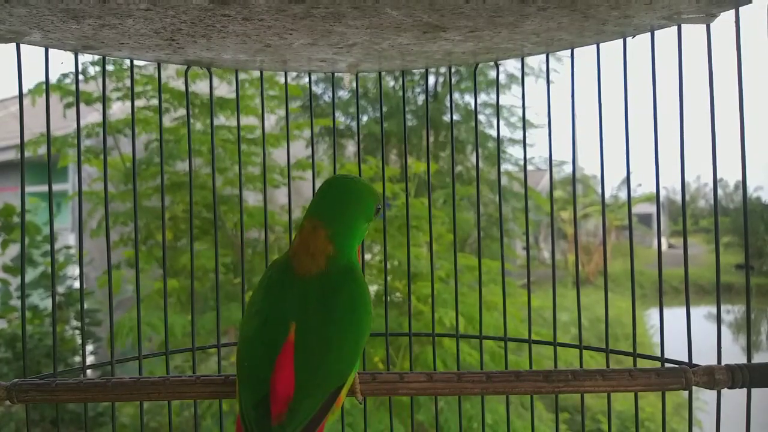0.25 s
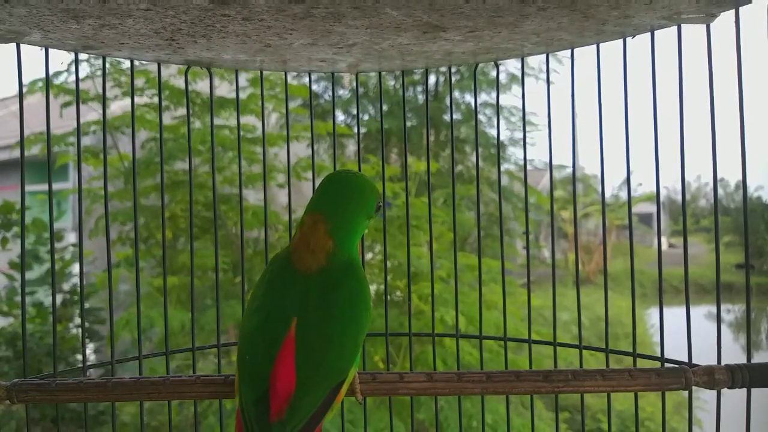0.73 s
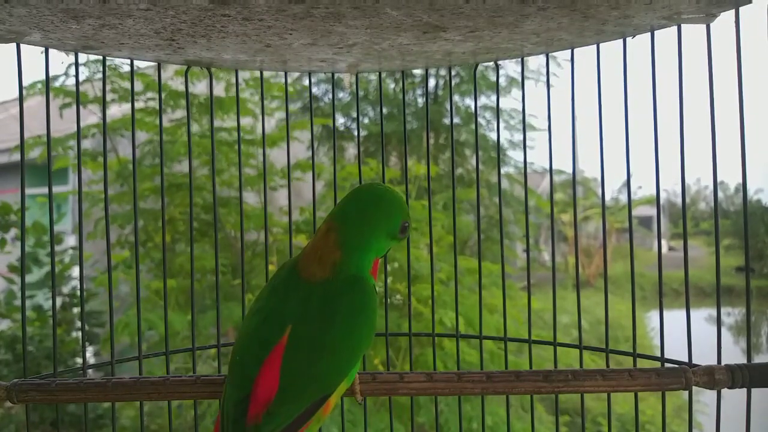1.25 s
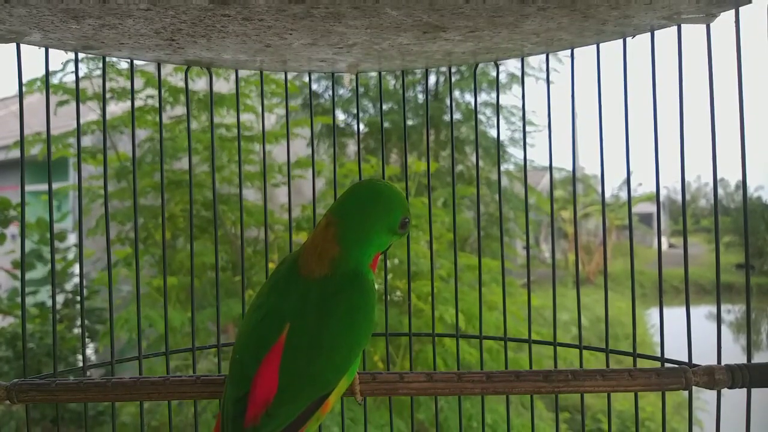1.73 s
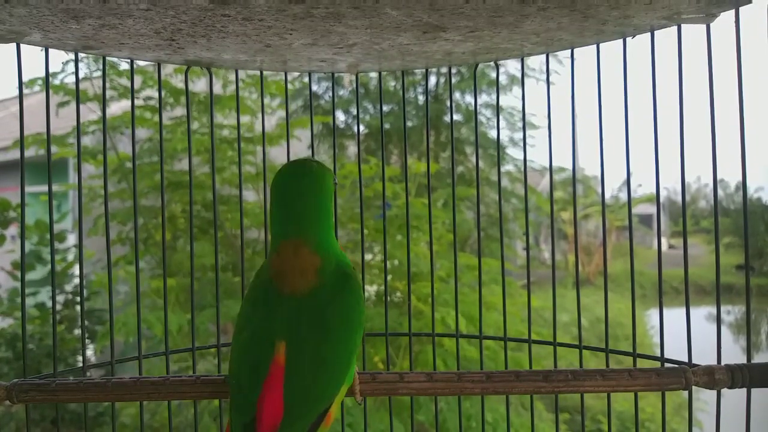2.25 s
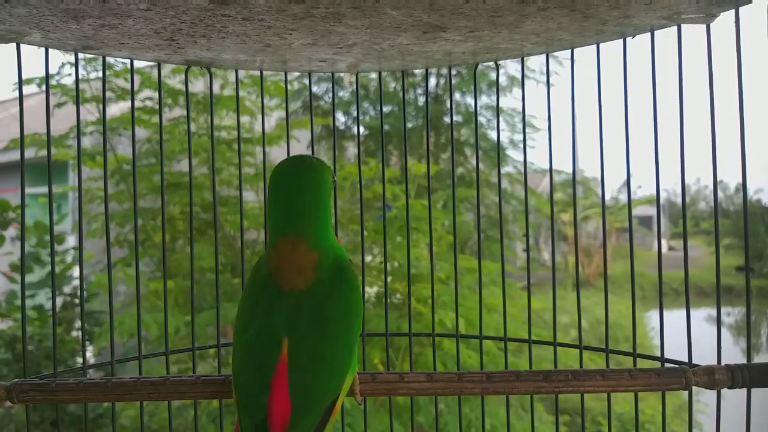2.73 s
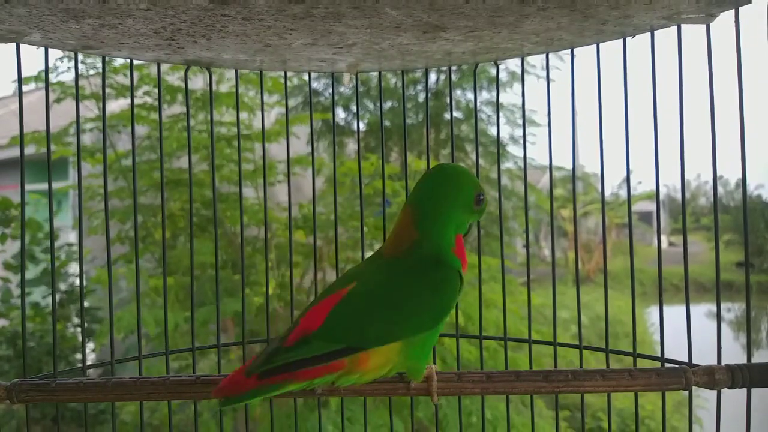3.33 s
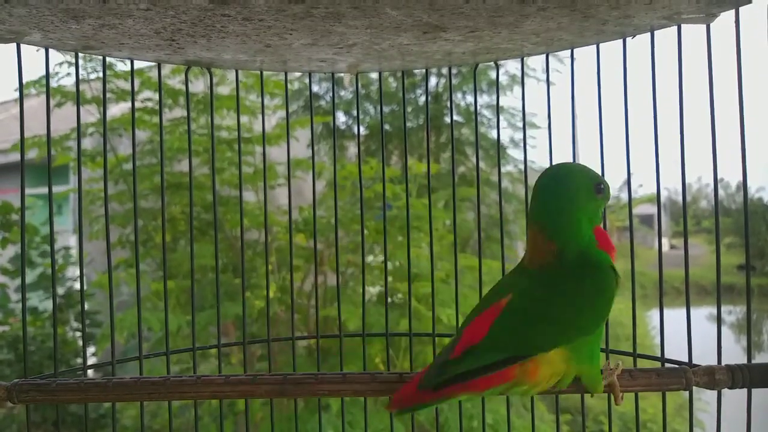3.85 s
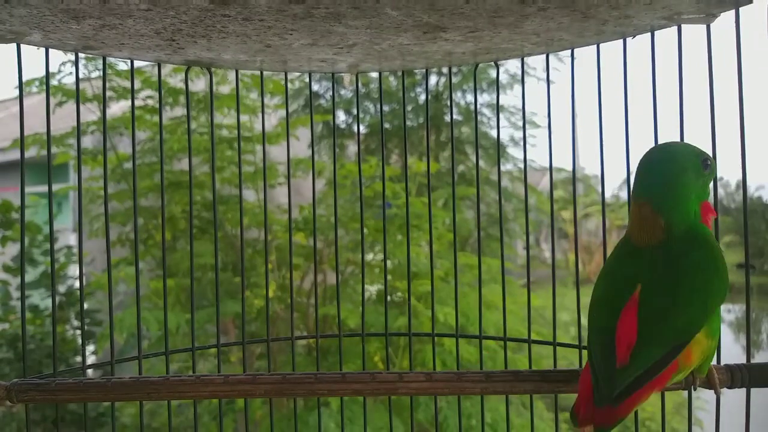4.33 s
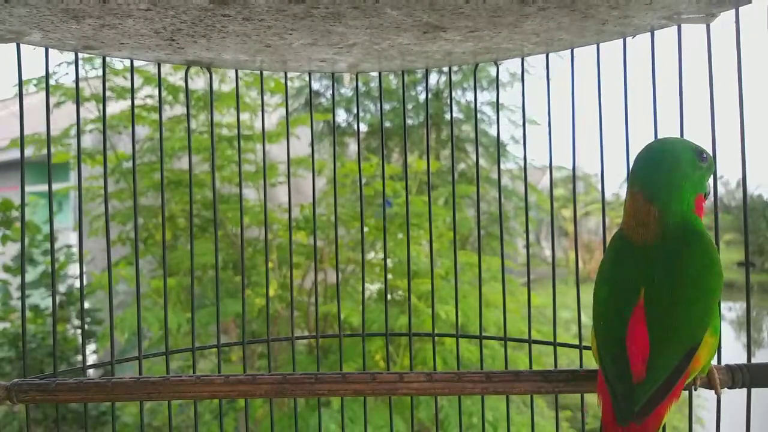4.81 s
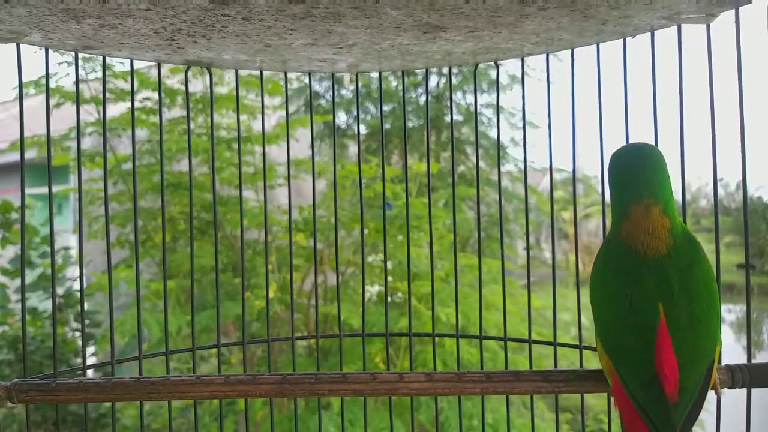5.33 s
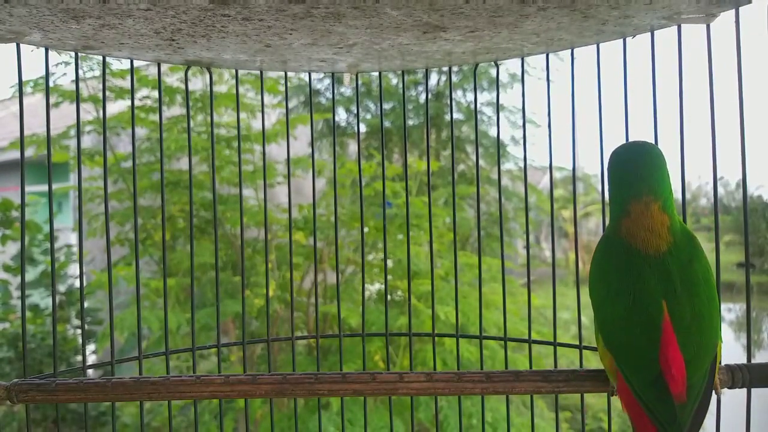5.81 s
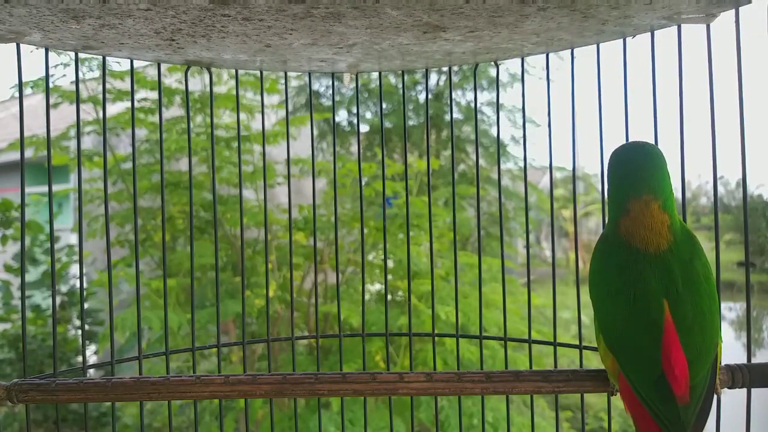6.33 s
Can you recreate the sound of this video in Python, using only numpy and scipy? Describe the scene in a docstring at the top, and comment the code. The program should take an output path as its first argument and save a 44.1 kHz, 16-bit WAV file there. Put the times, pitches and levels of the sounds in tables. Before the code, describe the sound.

A small caged parrot close by gives piercing whistles, fast trills and hoarse raspy bursts, then a hiss, with a rough squawk nearby and faint distant birds.

```python
"""Shrill whistles and trills of a small caged parrot close by: one gliding pitch with throat-shaped overtones.
Between them run hoarse bursts, chaotic harmonics mixed with noise, and swinging warbles; later comes a hiss,
noise through beak resonances. A rough low squawk, perhaps a larger bird nearby, rings in the yard: its lines
split by period doubling. Far birds tick, whistle, crow and chatter as faint tones and pulsing noise,
over a low hum of filtered noise."""
import sys
import numpy as np
from scipy import signal
from scipy.fft import rfft, irfft, next_fast_len
from scipy.io import wavfile
from scipy.ndimage import uniform_filter1d, map_coordinates

SR = 44100
rng = np.random.default_rng(int(sys.argv[2]) if len(sys.argv) > 2 else 0)


def to_wav(s):
    """Save 16-bit WAV."""
    ch = np.atleast_2d(s).T  # columns
    pcm = np.round(np.clip(ch, -1, 1) * 32767)  # PCM
    wavfile.write(sys.argv[1], SR, pcm.astype(np.int16))


N = 289737
T = np.arange(N) / SR  # time [s]
TOP_HZ = 15720  # band limit
# spectrum of the parrot's turbulent air: (frequency [Hz], relative level [dB])
RASP = [(1500, -48), (2100, -10), (4350, -13), (6000, -2), (7800, 1.5), (11600, -20), (13300, -53)]


def amp(db):
    """Decibel definition: 20 dB is a tenfold amplitude."""
    return 10 ** (np.asarray(db) / 20)


def unit(x):
    """Normalisation to unit root mean square."""
    return x / np.sqrt(np.mean(x ** 2) + 1e-20)


def along(points, hz):
    """Linear interpolation of (frequency [Hz], value) points on a logarithmic frequency axis."""
    f, v = np.transpose(points)
    return np.interp(np.log(hz + 1), np.log(f + 1), v)


def wobble(rate):
    """Slow random modulation: Gaussian knots, rate of them a second, joined by a spline."""
    knots = rng.standard_normal(int(N * rate / SR) + 4)
    return map_coordinates(knots, [T * rate])


def filtered(x, response):
    """Linear filtering: the spectrum of x times a complex response of frequency."""
    m = next_fast_len(N + 8192)
    return irfft(rfft(x, m) * response(np.fft.rfftfreq(m, 1 / SR)), m)[..., :N]


def coloured(x, spectrum):
    """Spectral shaping by (frequency [Hz], gain [dB]) points, then normalisation."""
    return unit(filtered(x, lambda hz: amp(along(spectrum, hz))))


def played(tables, fade):
    """Piecewise-linear control curves through all tables, and a gate that opens and shuts in fade seconds."""
    s, *cols = np.vstack(tables).T
    gate = 0
    for t in tables:
        inside = np.minimum(T - t[0][0], t[-1][0] - T)
        gate = gate + np.clip(inside / fade + .5, 0, 1)
    return [np.interp(T, s, c) for c in cols] + [np.clip(gate, 0, 1)]


def stack(hz, count):
    """Harmonic series 1..count, one row each: phase is the integral of a moving pitch."""
    phase = np.cumsum(2 * np.pi * hz / SR)
    return np.sin(np.arange(1, count + 1)[:, None] * phase)


def notes():
    """Vocal effort lifts pitch and level together: rows of (time, pitch, level, overtones) for each clear note."""
    # rising chirps: (start [s], length [s], start pitch [Hz], end pitch [Hz], peak level [dB], overtones [dB])
    rises = [(0.345, 0.034, 5560, 6045, -11.5, -3), (0.472, 0.013, 3660, 4216, -27, -14.5),
             (1.16, .026, 5457, 5720, -17, -11.5), (1.284, .015, 3400, 3857, -38, -11),
             (2.443, 0.06, 5650, 6004, -17.5, 9.5), (2.626, 0.012, 3434, 3510, -31, -13.5),
             (2.664, .036, 5035, 6050, -22.5, 14), (3.345, 0.035, 5437, 5857, -14, -3),
             (3.51, 0.017, 3259, 3420, -28, -8), (3.559, 0.029, 5490, 5800, -15, -1),
             (5.304, 0.035, 5575, 6220, -4.5, -1.5), (5.369, 0.033, 4780, 6080, -11.5, -9)]
    rise_db_per_oct, rise_peak, rise_fall_db = 126.5, .8, 2  # loudest at this share of the length, then eases
    # wide, fast sweeps: same columns
    sweeps = [(0.041, .013, 2719, 7030, -9, -8), (2.257, 0.0059, 3728, 1761, -20.5, 8),
              (2.264, .004, 4430, 2956, -21, 6.5), (2.372, 0.014, 6450, 7553, -1, -6.5),
              (2.6, .014, 4377, 3872, -27, -5), (5.277, .024, 4226, 5860, -22.5, -22.5),
              (5.409, 0.039, 6340, 4146, -18, -18.5), (5.661, 0.0079, 2160, 2883, -29, -11),
              (5.685, 0.011, 5720, 4233, -20, -27.5), (5.704, 0.014, 5300, 2944, -15.5, -26.5)]
    sweep_db_per_oct = 28.5
    # closing flourish: (time from its start [s], pitch [Hz])
    zigzag = [(0, 4076), (.011, 3120), (0.021, 4265), (.037, 3160), (.052, 2338)]
    # each flourish: (start [s], peak level [dB])
    zigzag_starts = [(.536, -27), (1.342, -31.5)]
    zigzag_overtones_db = -9
    # held shrill whistles: (start [s], length [s], start pitch [Hz], end pitch [Hz], peak level [dB],
    # overtones [dB], final droop [s])
    shrills = [(0.049, .23, 7010, 6776, -2, -6.5, .012), (2.275, .054, 6750, 6840, -5, -9, .03),
               (5.1, 0.095, 7420, 7280, -8, -13, 0.053), (5.199, 0.055, 6980, 7044, -7, -20, .022)]
    onset_s, onset_db, droop_db, droop_flat = .012, 4.5, 16.5, .068  # ends of a held whistle; flat is a share
    # opening notes of three runs, one curve each: (time [s], pitch [Hz], peak level [dB])
    openings = [
        [(.957, 2200, -47), (.99, 3080, -29), (1.03, 4100, -25), (1.075, 3360, -30), (1.104, 2330, -28)],
        [(3.193, 3864, -45.5), (3.212, 2770, -38.5), (3.24, 2300, -22), (3.272, 2220, -22.5)],
        [(3.824, 7080, -22), (3.832, 6046, -17.5), (3.842, 7840, -10.5), (3.858, 8500, -36)],
    ]
    # overtones of each opening note: (level [dB])
    opening_overtones = [-20, 2, 2.5]

    def effort(s, hz, db, over_db, db_per_oct):
        """Level falls in proportion to the octaves below the note's highest pitch."""
        return [(a, b, db - db_per_oct * np.log2(max(hz) / b), over_db) for a, b in zip(s, hz)]

    out = []
    for s, d, a, b, db, over in rises:
        climb = effort((s, s + rise_peak * d), (a, a + rise_peak * (b - a)), db, over, rise_db_per_oct)
        out.append(climb + [(s + d, b, db - rise_fall_db, over)])
    for s, d, a, b, db, over in sweeps:
        out.append(effort((s, s + d), (a, b), db, over, sweep_db_per_oct))
    since, pitch = np.transpose(zigzag)
    for s, db in zigzag_starts:
        out.append(effort(since + s, pitch, db, zigzag_overtones_db, sweep_db_per_oct))
    for s, d, a, b, db, over, droop in shrills:
        out.append([(s, a, db - onset_db, over), (s + onset_s, a, db, over), (s + d - droop, b, db, over),
                    (s + d, b * (1 - droop_flat), db - droop_db, over)])
    for note, over in zip(openings, opening_overtones):
        out.append([(*row, over) for row in note])
    return sorted(out, key=lambda note: note[0][0])


def whistles():
    """Source and filter: the syrinx sings one pitch, the throat sets its overtones, air rasps in trill breaks."""
    # trills: (first dip [s], dips [count], rate [Hz], pitch dip [0-1], level dip [0-1], pitch lead [turns])
    trills = [(.113, 9, 65.34, .15, .9, 0.012), (.977, 13, 123.9, .27, 0.62, 0.18),
              (2.27, 2, 113.7, 0.15, 0.95, 0.028), (2.2875, 14, 377.3, 0.1, 0.5, 0.17),
              (5.103, 16, 323, 0.1, 0.3, 0)]
    limp, flutter = .12, .03  # slow trills: delay of every second dip [turns], pitch flutter of long beats [share]
    # throat response: (frequency [Hz], gain [dB])
    throat = [(3300, 0), (4600, -13), (7000, 4), (9200, 6), (11800, -14), (14500, -32)]
    hz, db, over, gate = played(notes(), fade=.003)
    db = uniform_filter1d(db, size=90)
    level = amp(db + .7 * wobble(400)) * gate
    leak = .4
    hz = uniform_filter1d(hz, size=130)  # the muscles round off each turn of the pitch
    for start, dips, rate, bend, depth, lead in trills:
        turns = rate * (T - start)
        sharp = 2 + 280 / rate  # slow trills break briefly
        slow = rate < 100
        turns = turns - slow * limp * np.sin(np.pi * turns / 2) ** 2
        on = (turns > -.5) & (turns < round(dips) - .5)
        hz = hz * (1 - on * bend * (np.abs(np.cos(np.pi * (turns + lead))) ** sharp - .2))
        long_beat = np.clip(np.sin(np.pi * turns), 0, 1)
        hz = hz * (1 + on * slow * flutter * long_beat * wobble(1500))
        dip = on * np.abs(np.cos(np.pi * turns)) ** sharp
        level = level * (1 - np.clip(depth, 0, 1) * dip)
        leak = leak + dip
        over = over - 12 * dip
    hz = hz * (1 + .0069 * wobble(500))
    k = np.arange(1, 6)[:, None]  # harmonic number
    shape_db = along(throat, k * hz) - along(throat, hz)  # relative to the fundamental
    overtone_db = (k > 1) * (over + 1.5 * wobble(300)) - .75 * (k - 1) ** 2
    gains = amp(shape_db + overtone_db) * (k * hz < TOP_HZ)
    air = amp(db - 33.5) * leak * gate * coloured(rng.standard_normal(N), RASP)
    return level * (gains * stack(hz, count=5)).sum(0) + air


def hoarse():
    """Chaotic vibration: a low, lurching pitch whose harmonics flare in turbulent air; clear notes hush it."""
    # hoarse runs, one curve each: (time [s], level [dB])
    runs = [
        [(.283, -34), (.38, -25.5), (.47, -28.5), (.58, -40)],
        [(.96, -39), (1.02, -25), (1.27, -27.5), (1.29, -38.5), (1.39, -32)],
        [(2.251, -25.5), (2.383, -30)],
        [(2.441, -31.5), (2.5, -22.5), (2.65, -27.5), (2.7, -20.5), (2.755, -28.5)],
        [(3.22, -40), (3.275, -22.5), (3.55, -25), (3.59, -21), (3.645, -29)],
        [(5.17, -25), (5.2, -29), (5.26, -36.5), (5.34, -22), (5.445, -20.5)],
    ]
    db, gate = played(runs, fade=.01)
    hz = 1950 * (1 + .12 * wobble(45) + .03 * wobble(700))
    flare = np.array([1 + .7 * wobble(180) for _ in range(3)])
    lines = unit((flare * stack(hz, count=5)[2:]).sum(0))  # harmonics 3 to 5
    chaos = lines + 1.35 * rng.standard_normal(N)
    hush = 1 - .65 * played(notes(), fade=.0029)[-1]
    return amp(db) * gate * hush * unit(amp(1.6 * wobble(260)) * coloured(chaos, RASP))


def warbles():
    """Frequency modulation: a rough tone swings down and up again, loudest at the top."""
    # tones within the hoarse bursts: (start [s], length [s], peak level [dB])
    swings = [(0.375, 0.095, -20), (1.185, 0.1, -24), (2.491, 0.082, -14), (2.699, 0.03, -17.5)]
    top_hz, swing_hz, period_s, lead_s, dip_db = 8070, 2160, .053, .016, 9.5
    start = np.array([s for s, _, _ in swings])
    db, gate = played([[(s, db), (s + d, db)] for s, d, db in swings], fade=.006)
    since = T - start[np.clip(np.searchsorted(start, T + .01) - 1, 0, None)]
    down = np.sin(np.pi * (since - lead_s) / period_s) ** 4
    hz = (top_hz - swing_hz * down) * (1 + .015 * wobble(600))
    return gate * amp(db - dip_db * down) * stack(hz, count=1)[0]


def hiss():
    """Turbulence through resonances of the half-open beak; the treble fades as the push weakens."""
    # course of the hiss: (time [s], level below the treble [dB], treble relative to that [dB])
    course = [(3.85, -50.5, 22.5), (3.93, -32.5, -2.5), (4.2, -30.5, -9), (4.5, -36, -36.5)]
    # beak resonances, before they slide: (centre [Hz], width [Hz], gain [dB])
    resonances = [(4760, 160, 3), (6470, 530, 2.5), (8460, 660, 3)]
    # the resonances sink as the beak closes: (time [s], frequency factor [ratio])
    slide = [(4.1, 1.01), (4.4, 0.96)]
    db, treble_db, gate = played([course], fade=.011)

    def beak(f):
        """Parallel band-pass resonators of alternating sign."""
        total = 0
        for k, (c, w, g) in enumerate(resonances):
            total = total + (-1) ** k * amp(g) * 1j * f * w / (c * c - f * f + 1j * f * w)
        return total

    (s0, wide), (s1, narrow) = slide

    def both_ends(f):
        """Open and closing beak, each with a direct leak, within a common band."""
        return ([beak(f / wide), beak(f / narrow)] + np.array(.1)) * (f > 1500) / (1 + (f / 12000) ** 12)

    shut = np.clip((T - s0) / (s1 - s0), 0, 1) * np.pi / 2
    breath = rng.standard_normal((2, N)) * amp(2.2 * wobble(230))
    ends = filtered(breath, both_ends)
    air = ends[0] * np.cos(shut) + ends[1] * np.sin(shut)  # equal-power crossfade
    low = filtered(air, lambda f: 1 / (1 + (f / 5500) ** 10))
    return gate * amp(db) * (unit(low) + amp(treble_db) * unit(air - low))


def squawk():
    """Period doubling: strong and weak cycles alternate under effort, putting wavering lines about halfway."""
    # squawks: (start [s], hold [s], pitch at start of hold [Hz], pitch at its end [Hz], level [dB])
    table = [(4.091, 0, 1440, 1420, -25), (4.122, 0.0044, 952, 934, -24), (4.455, 0.37, 1038, 1050, -23),
             (5.285, 0.047, 981, 987, -35), (5.386, 0.015, 848, 883, -37.5)]
    # gullet response: (frequency [Hz], relative gain [dB])
    gullet = [(600, -34), (1050, -3.5), (1440, -16.5), (2000, -5), (3600, -2.5), (4400, -14.5),
              (6200, -24.5), (12500, -29), (13500, -59)]
    attack_s, attack_db, release_s, release_db = .07, 7, .2, 24
    end_flat = .04  # pitch is this share flat at both ends of a call
    crowd, sink = .015, .08  # loud calls: overtones are this share flat; the whole-numbered ones sink this much more
    times = np.cumsum([(s, attack_s, hold, release_s) for s, hold, *_ in table], axis=1)
    # a new call cuts the last one short
    times = np.flip(np.minimum.accumulate(np.flip(times).ravel())).reshape(times.shape)
    flat = end_flat * np.array([1, 0, 0, 1])
    soft_db = np.array([attack_db, 0, 0, release_db])
    calls = []
    for t, (_, _, a, b, db) in zip(times, table):
        pitch = np.repeat([a, b], 2) * (1 - flat)
        calls.append(np.transpose([t, pitch, db - soft_db, [db] * len(t), np.linspace(0, 1, len(t))]))
    hz, db, top_db, late, gate = played(calls, fade=.02)
    effort = np.clip((db + 42) / 20, .55, 1)  # a harder push is rougher
    strain = np.clip((top_db + 32) / 9, 0, 1)  # loud calls split and crowd their lines
    voice = 1.85 * effort * rng.standard_normal(N)  # rasping air
    for k in range(2, 12):  # lines at multiples of half the pitch
        drift = 1 + .001 * k * wobble(6) * strain + .026 * effort * wobble(250)
        crowding = 1 - (k > 2) * strain * (crowd + sink * late * (k % 2 == 0))
        line_gain = amp(-(22 - 18 * strain) * (k % 2))  # halfway lines are weaker
        throb = .35 + .65 * wobble(55)
        voice += line_gain * throb * stack(k / 2 * crowding * hz * drift, count=1)[0]
    return gate * amp(uniform_filter1d(db, size=400)) * coloured(voice, gullet)


def far_birds():
    """Faint tones and noise under amplitude envelopes: double ticks, thin whistles, crowing, pulsing chatter."""
    # ticks: (time [s], level [dB])
    tick_table = [(1.4852, -39), (2.149, -41.5), (5.867, -45), (5.999, -41.5), (6.1367, -39.5),
                  (6.281, -39), (6.403, -38.5)]
    # thin whistles: (start [s], end [s], start pitch [Hz], end pitch [Hz], level [dB])
    thin = [(1.865, 2.024, 4565, 3940, -55.5), (6.166, 6.343, 4380, 3950, -62.5)]
    # crowing: (start [s], end [s], start pitch [Hz], level [dB])
    crows = [(1.633, 1.806, 364, -67.5), (2.011, 2.23, 338.7, -66.5)]
    # harmonics heard of each crow: number: gain [dB]
    crow_harmonics = {3: -2.5, 4: 0}
    crow_top_hz = 392  # each crow eases up to this pitch
    # chatter, one curve each: (time [s], level before the pulses [dB])
    chatter = [
        [(1.54, -64.5), (2.24, -59)],
        [(5.9, -64.5), (6.57, -71)],
    ]
    out, t = np.zeros(N + SR), np.arange(SR // 50) / SR
    tick = amp(-60 * t / .021) * (1 - np.exp(-t / .00042)) * np.sin(2 * np.pi * 7400 * t)
    for s, db in tick_table:
        out[round(s * SR):][:len(t)] += amp(db) * tick
        out[round((s + .024) * SR):][:len(t)] += amp(db - 10) * tick
    out, quaver = out[:N], wobble(120)
    for start, end, hz0, hz1, db in thin:
        u = np.clip((T - start) / (end - start), 0, 1)
        hz = hz0 + (hz1 - hz0) * u ** 3 + 30 * quaver
        out += amp(db + 1.6 * quaver) * np.sin(np.pi * u) * stack(hz, count=1)[0]
    for start, end, hz0, db in crows:
        u = np.clip((T - start) / (end - start), 0, 1)
        lines = stack(crow_top_hz - (crow_top_hz - hz0) * (1 - u) ** 2 + 4 * quaver, count=4)
        out += np.sin(np.pi * u) * sum(amp(db + g) * lines[k - 1] for k, g in crow_harmonics.items())
    db, gate = played(chatter, fade=.046)
    blur = coloured(rng.standard_normal(N), [(5000, -35), (6200, -2.5), (7600, 3.5), (8800, -28)])
    swell = np.cos(np.pi * 7.65 * (T - 1.575)) ** 2  # 7.65 pulses a second
    return out + gate * amp(db) * (.41 + swell) * blur


def hum():
    """Distant traffic and air: low-weighted noise, highly correlated between the two ports."""
    # hum spectrum: (frequency [Hz], relative level [dB])
    spectrum = [(25, -34.5), (90, -2), (200, -3), (420, -21), (700, -30), (1000, -42.5), (7300, -41),
                (8500, -51), (15000, -57.5)]
    # slow swell: (time [s], level [dB])
    swell = [(.9, -54), (2.2, -50), (5.1, -53), (5.7, -50.5)]
    mid, side = [coloured(rng.standard_normal(N), spectrum) for _ in range(2)]
    level = amp(np.interp(T, *np.transpose(swell)) + wobble(5))
    return level * (mid + amp(-23) * np.array([side, -side]))


def yard(x, t60, gap, apart=.44):
    """Diffuse reverberation: convolution with noise that decays 60 dB in t60 seconds, after a gap in seconds."""
    t = np.arange(SR // 2) / SR
    tail = rng.standard_normal((2, len(t))) * amp(-60 * t / t60) * (t > gap)
    tail[1] = tail[0] + apart * tail[1]  # the ports are close together
    tail = tail / np.linalg.norm(tail, axis=1)[:, None]
    return signal.fftconvolve(x[None], tail, axes=1)[:, :N]


def scene():
    """Superposition of direct sounds, their reverberation and the hum, at two ports."""
    parrot = whistles() + hoarse() + warbles() + hiss()
    other, far = squawk(), far_birds()
    cage = amp(-14) * yard(parrot, t60=.09, gap=.003)
    near = parrot + cage + amp(-31) * yard(parrot, t60=.68, gap=.02)
    walls = amp(-4) * yard(other, t60=.3, gap=.02, apart=.3)
    distance = far + amp(-7.5) * yard(far, t60=.22, gap=.014)
    return near + other * amp([[-.6], [.6]]) + walls + distance + hum()


def record(dry):
    """Saturation rounds off the loudest peaks; band limiting keeps nothing above TOP_HZ."""
    rounded = dry / (1 + np.abs(dry) ** 8) ** (1 / 8)
    return filtered(rounded, lambda hz: hz < TOP_HZ)


dry = scene()
out = record(dry)
to_wav(out)
```